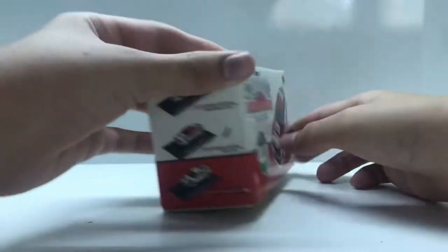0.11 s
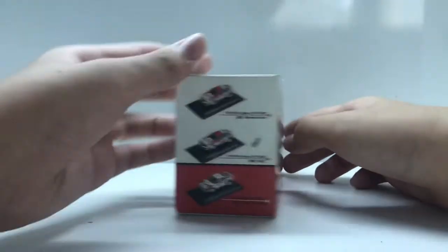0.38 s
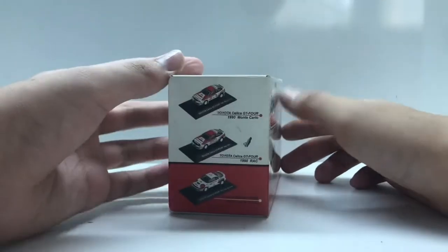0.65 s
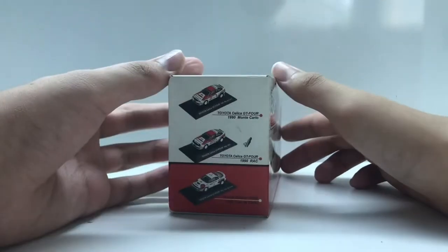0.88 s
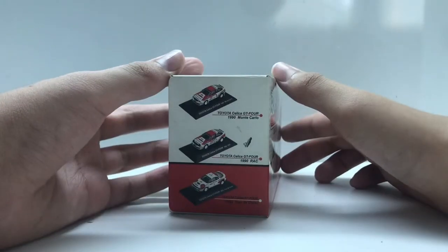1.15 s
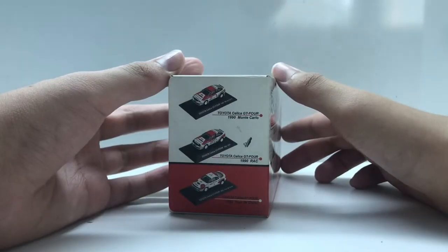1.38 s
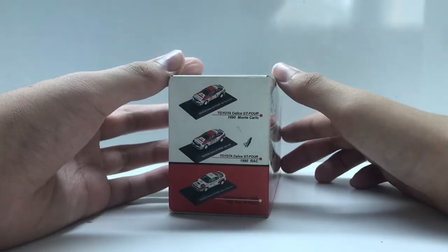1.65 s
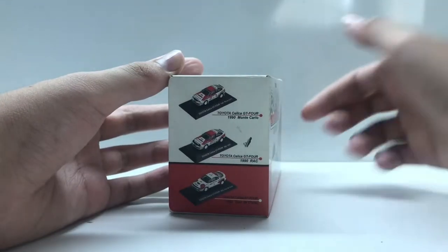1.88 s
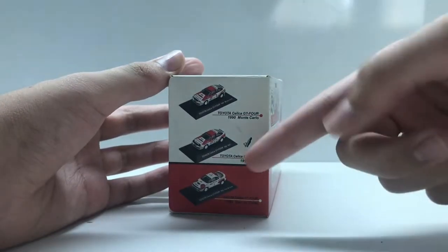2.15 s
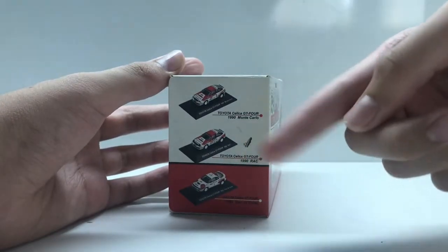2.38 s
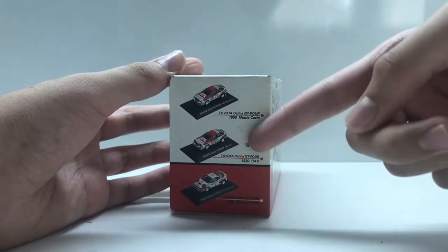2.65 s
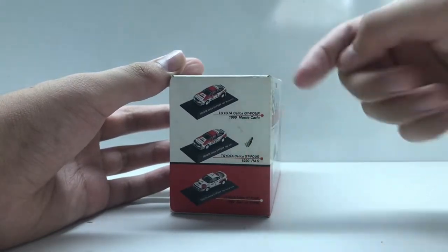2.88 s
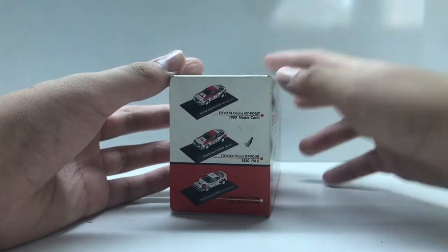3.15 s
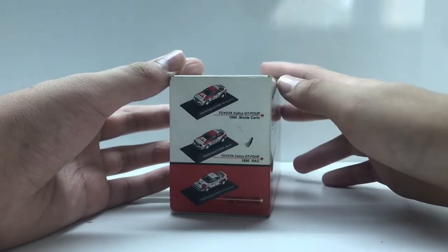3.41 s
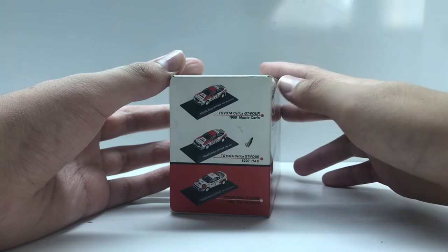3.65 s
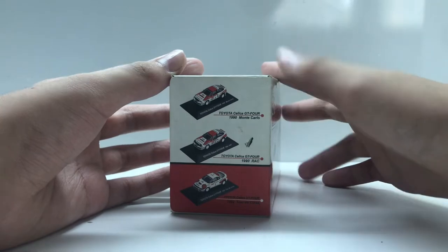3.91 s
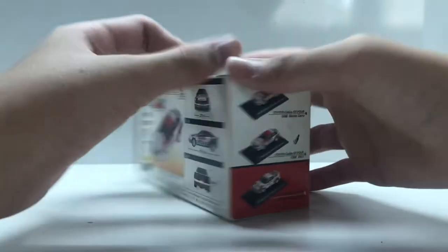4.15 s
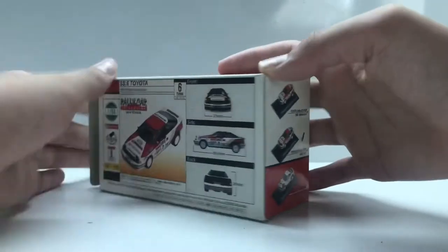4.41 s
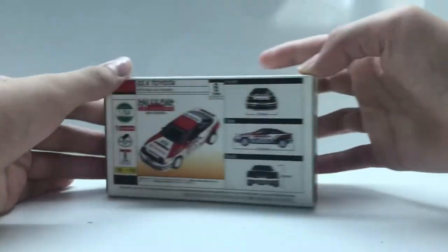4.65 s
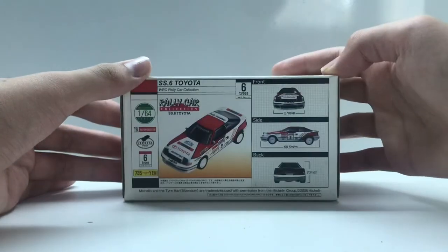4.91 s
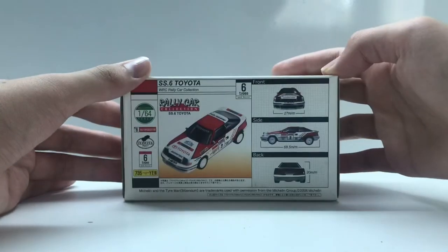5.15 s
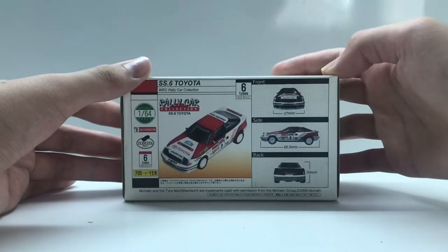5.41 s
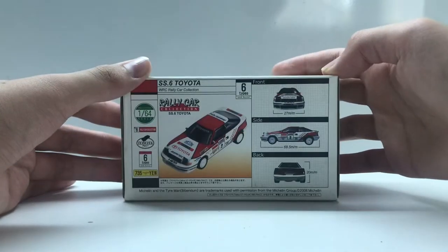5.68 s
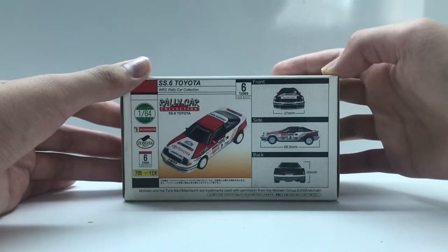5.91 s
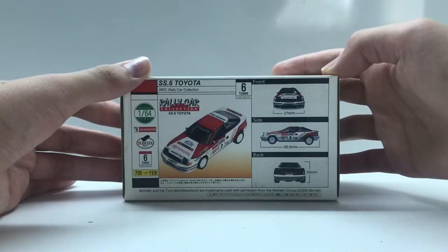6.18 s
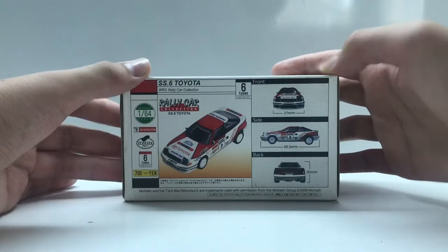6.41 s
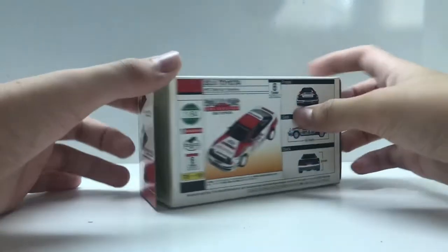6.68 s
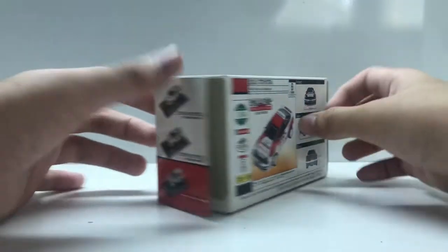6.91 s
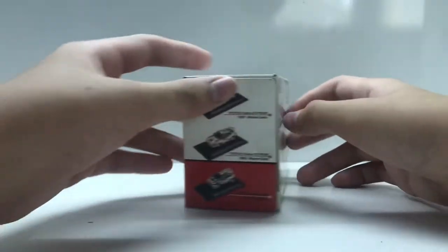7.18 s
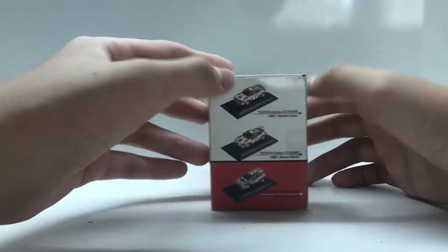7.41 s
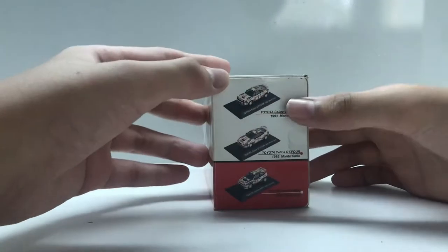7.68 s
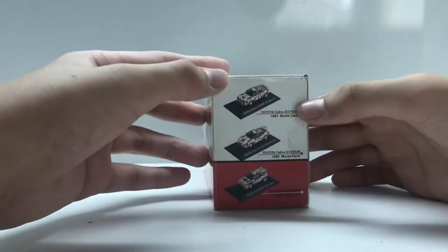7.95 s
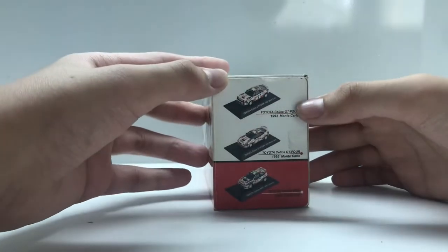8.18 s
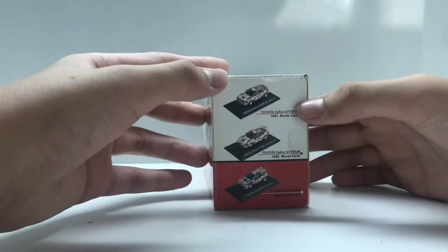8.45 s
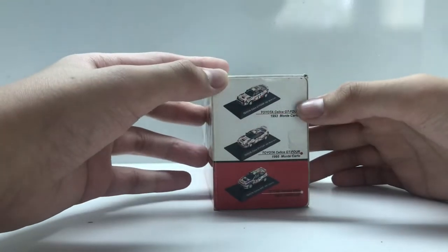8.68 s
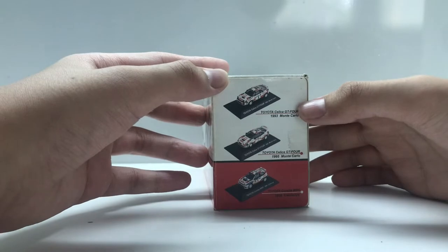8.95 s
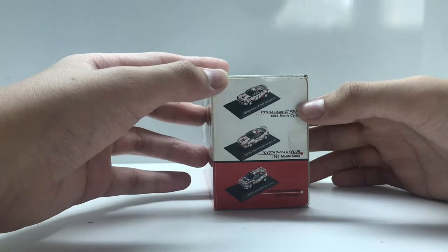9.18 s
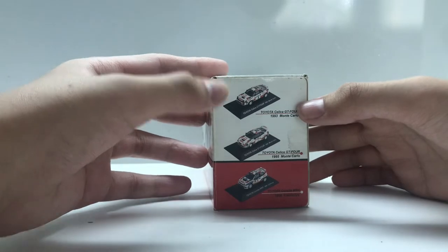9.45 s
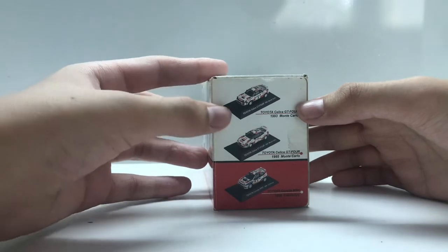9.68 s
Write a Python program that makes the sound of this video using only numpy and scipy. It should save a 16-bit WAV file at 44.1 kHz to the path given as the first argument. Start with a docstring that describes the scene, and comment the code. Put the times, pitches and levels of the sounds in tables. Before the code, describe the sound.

Hands shift a light, hollow card box on a table: quick knocks and rubs first, then near silence, a soft low hand thump and two loud, crisp nail taps. Later come dry, slightly squeaky slides as it turns, a pause, more slides ending in hard clacks, then quiet and a few tiny touches. Close microphone, small room, low background hum and hiss.

```python
"""A small cardboard box is turned by hand on a hard table, close to the microphone in a quiet room.
Friction and singing edges make its slides; touches, knocks and two fingernail taps ring its modes.
Soft hand landings ring the table top as low decaying tones; desk and walls answer the box as filtered noise.
Behind it are wavering sines and narrow drones of a far engine, and shaped noise for room and microphone hiss."""
import sys
import numpy as np
from scipy import signal
from scipy.fft import rfft, irfft, next_fast_len
from scipy.io import wavfile
from scipy.ndimage import uniform_filter1d

SR = 44100
rng = np.random.default_rng(int(sys.argv[2]) if len(sys.argv) > 2 else 0)


def linear_from_db(decibels):
    """Turn decibels (scalar or array-like) into linear amplitude factors; 0 gives 1."""
    return 10 ** (np.asarray(decibels, float) / 20)


def master_out(mix):
    """Clip the mix to full scale and print it as 16-bit PCM to the path in sys.argv[1]."""
    frames = np.transpose(np.atleast_2d(mix))
    ceiling = np.clip(frames, -1, 1)
    pcm = np.round(ceiling * 32767).astype(np.int16)
    wavfile.write(sys.argv[1], SR, pcm)


N = 433062   # length of the scene in samples

# pitches of the box modes: f/Hz
MODE_HZ = [170, 255, 350, 445, 535, 613, 692, 785, 943, 1090, 1120, 1235, 1350, 1650, 2150, 2600, 3030,
           3500, 3910, 4240, 4480, 5250, 5900, 6600, 8400, 10900, 14300]
# box modes, one row for each pitch:
# t60 when struck/s, level struck on the end/dB, level struck on the long side/dB, level dragged/dB
BOX_MODES = [(0.022, -13, -13.5, -22), (0.043, -10.5, -8, -11), (0.014, -7, -6, -6),
             (0.067, -7, -17.5, -15.5), (.03, -16, -12, -15), (0.051, -15.5, -2.5, -17.5),
             (.04, -16.5, -9, -16), (0.035, -17, -7.5, -5.5), (0.031, -15, -4.5, -5.5),
             (0.029, 1.5, -10, -5.5), (0.19, -30.5, -30, -25), (0.023, -13.5, -12.5, -17),
             (0.029, -7.5, -7, -6.5), (0.005, 2.5, -4, -2.5), (0.0078, -10.5, -5, -4),
             (0.011, -12.5, -8.5, -7.5), (0.014, -24.5, -20.5, -6), (0.0078, -29.5, -5, -10.5),
             (.016, -17, -16.5, -15.5), (0.027, -23.5, -21, -14.5), (0.015, -12, -19, -17),
             (0.0016, 9.5, -12, 1.5), (0.005, -8.5, -10.5, -16), (0.0044, -23, -9, -16),
             (0.0048, -11, -15, -16), (0.002, -5, -9, -16), (.002, -8, -9.5, -16)]


def rms_one(x):
    """Scale to unit power."""
    return x / np.sqrt(np.mean(x ** 2) + 1e-20)


def evened(x):
    """Hold the power of a signal steady over about 60 ms."""
    return x / np.sqrt(uniform_filter1d(x ** 2, size=2600) + 1e-20)


def in_time(rows):
    """Columns of a curve at every sample."""
    s, *columns = np.transpose(rows)
    return np.array([np.interp(np.arange(N) / SR, s, c) for c in columns])


def drift(rate_hz):
    """Slow random wander of spread 1: noise through two equal poles, drawn at every 40th sample."""
    hop, settle = 40, 2000
    r = np.exp(-2 * np.pi * rate_hz * hop / SR)
    noise = rng.standard_normal(N // hop + 2 + settle)
    slow = signal.lfilter([1], [1, -2 * r, r * r], noise)[settle:]
    return np.interp(np.arange(N) / hop, np.arange(len(slow)), rms_one(slow))


def ring(force, hz, t60):
    """A mode as a two-pole resonator: a unit click sets a decaying sine of starting height 1 ringing."""
    r = linear_from_db(-60 / (t60 * SR))
    w = 2 * np.pi * hz / SR
    return signal.lfilter([0, np.sin(w)], [1, -2 * r * np.cos(w), r * r], force + 1e-18)


def coloured(x, spectrum):
    """Filter a signal by a curve of (Hz, dB), straight over log frequency; rms 1."""
    size = next_fast_len(N)
    hz, db = np.transpose(spectrum)
    grid = np.maximum(np.fft.rfftfreq(size, 1 / SR), 1)
    gain = linear_from_db(np.interp(np.log(grid), np.log(hz), db))
    return rms_one(irfft(rfft(x, size) * gain, size)[:N])


def air():
    """Room noise and microphone hiss: random noise with a fixed colour and a slowly wavering level."""
    # colour of the noise: f/Hz, relative level per Hz/dB
    air_colour = [(15, -61), (30, -19), (64, -5), (145, -2.5), (317, -14), (405, -14), (463, -18),
                  (775, -25), (936, -22.5), (1330, -24), (2110, -33.5), (2610, -34), (5000, -41.5),
                  (10400, -46.5), (14800, -45), (16000, -71.5)]
    # the room noise sinks late: t/s, level over the base/dB
    air_swell = [(0, 4.5), (6.2, 4), (7, 4.5), (9.82, 1)]
    base_db, waver_db = -58.5, drift(3.)
    level = linear_from_db(base_db + in_time(air_swell)[0] + waver_db)
    return level * coloured(rng.standard_normal(N), air_colour)


def rumble():
    """A far engine: sines wavering in pitch and level, and narrow bands of noise that come and go."""
    # two engine tones, each with rows of: t/s, f/Hz, level/dB
    engine_tones = [
        [(0, 90.1, -60.5), (2.1, 85.5, -58), (2.55, 85.8, -47), (3.3, 85.3, -56), (3.7, 86, -60.5),
         (4.4, 91.6, -60), (6.5, 83.8, -55.5), (7.9, 83.1, -64), (8.3, 82.3, -67), (9.82, 81.8, -61.5)],
        [(0, 129.5, -50), (.5, 125.9, -67), (1.3, 130.3, -52.5), (1.7, 131.2, -60), (2.8, 128.6, -62),
         (3.5, 132.4, -51), (4.2, 134.4, -56.5), (4.9, 135, -53), (5.02, 134.9, -64), (5.15, 136.1, -46),
         (5.4, 134.5, -57.5), (6.3, 125.7, -57.5), (6.8, 128.8, -67), (8.5, 151.1, -62.5), (9.0, 144, -55.5),
         (9.4, 140.4, -67), (9.82, 137, -60.5)],
    ]
    # fainter tones and a low drone: start/s, end/s, f/Hz, level/dB, width/Hz
    drones = [(1.35, 3.9, 214, -62, 0.5), (3.46, 5.1, 180, -62, 2.3), (0.13, 11, 62, -58.5, 6.8)]
    fade_s = 0.16   # centred on each start and end
    out, t = 0, np.arange(N) / SR
    for tone in engine_tones:
        hz, level_db = in_time(tone)
        level = np.sqrt(2) * linear_from_db(level_db + 3.0 * drift(8.3))
        wavering_hz = hz + 1.5 * drift(3.)
        out = out + level * np.sin(2 * np.pi * np.cumsum(wavering_hz) / SR)
    for start, end, hz, db, width in drones:
        band = signal.butter(1, [hz - width / 2, hz + width / 2], "band", fs=SR, output="sos")
        on = np.clip(np.minimum(t - start, end - t) / fade_s + .5, 0, 1)
        noise = signal.sosfilt(band, rng.standard_normal(N + SR))[SR:]   # the filter settles for 1 s
        out = out + linear_from_db(db) * on * rms_one(noise)
    return out


def room(x):
    """Dense echoes off the desk die at once; the walls answer later, diffuse and longer."""
    desk_t60_s, desk_db = 0.03, -10.5
    wall_t60_s, wall_db, wall_lag_s, wall_cut_hz = 0.37, -21.5, 0.014, 13000
    bass_cut_hz = 706   # thins both echoes after their levels are set
    t = np.arange(SR // 2) / SR
    scatter = rng.standard_normal((2, len(t)))
    desk = scatter[0] * linear_from_db(-60 * t / desk_t60_s) * (t > .001)
    walls = scatter[1] * linear_from_db(-60 * t / wall_t60_s) * np.clip(t / wall_lag_s, 0, 1) ** 3
    walls = signal.sosfilt(signal.butter(1, wall_cut_hz, fs=SR, output="sos"), walls)
    echo = linear_from_db(desk_db) * desk / np.linalg.norm(desk) + linear_from_db(wall_db) * walls / np.linalg.norm(walls)
    echo = signal.sosfilt(signal.butter(1, bass_cut_hz, "high", fs=SR, output="sos"), echo)
    return signal.fftconvolve(x, echo)[:N]


def thud():
    """A hand lands softly: a smooth push of three quarters of a cycle rings the table top."""
    # soft landings: t/s, f/Hz, strength/dB, t60/s
    landings = [(1.946, 78, -36, 0.24), (9.418, 230, -41.5, 0.023), (9.426, 258, -40.5, 0.028),
                (9.442, 203, -45, 0.063)]
    out = 0
    for s, hz, db, t60 in landings:
        phase = (np.arange(N) / SR - s) * hz / .75
        push = np.sin(np.pi * np.clip(phase, 0, 1)) ** 2
        out = out + linear_from_db(db) * ring(2 * push / push.sum(), hz, t60)
    return out


def pushes(count, contact_ms):
    """A short contact is a click, a long one a crumbling puff: 40 ms of force in each row, unit energy."""
    after = np.arange(int(.04 * SR))
    phase = after / (contact_ms * SR / 1000)
    puff = rng.standard_normal((count, len(after))) * np.sqrt(phase) * np.exp(-phase)
    click = (after == 0) * 0.71 / contact_ms
    push = click + puff / np.linalg.norm(puff, axis=1, keepdims=True)
    return push / np.linalg.norm(push, axis=1, keepdims=True)


def blows(count, contact_ms, crumble):
    """A hard contact is one smooth push plus a little crumbling that outlasts it."""
    phase = (np.arange(int(.04 * SR)) + 1) / (contact_ms * SR / 1000)
    push = np.sin(np.pi * np.minimum(phase, 1)) ** 2
    return push / push.sum() + crumble * pushes(count, 2 * contact_ms)


def contacts():
    """Every push rings the box; weight drives the low modes, hardness the high ones and the crack."""
    # touches of fingers and card: t/s, strength/dB, weight/dB, hardness/dB, long side share/0-1
    touch_rows = [(0.3846, -35, -16, -9, 0.5), (0.432, -30.5, 0, -1.5, 0.43), (0.459, -33.5, 7.5, -13, 0.9),
                  (0.504, -51, -9, -3, .5), (0.647, -32, -20, -8, 0.24), (0.68, -40.5, -10, -4, 0.6),
                  (0.854, -46.5, -10, -3, 0.45), (1.755, -36, -14, -18, 0.6), (1.801, -38.5, -21, 3, 0.93),
                  (1.926, -38.5, -9, -15, 0.8), (2.02, -53, -15, -3, 0.39), (3.16, -33.5, 5, -5, 0.8),
                  (3.176, -32, -8, -19, .3), (3.181, -32.5, -13, -3, 0.74), (3.186, -29, -12, -15, 0.4),
                  (3.213, -33.5, -25, -6, 0.65), (3.263, -37, -13, -11.5, 0.4), (3.272, -41, -11, -5, 0.6),
                  (3.278, -51, -8, -9, 0.1), (3.303, -41.5, -17, -20, 0.51), (3.581, -49, 3.5, -19, 0.94),
                  (3.923, -38.5, 1, -11, 0.87), (3.947, -38, 2, -17, 1), (4.38, -37, 12, -22, 0.94),
                  (4.448, -47, -17, -2, 0.3), (4.828, -39.5, -7, 3, 0.5), (4.9473, -28, -6.5, -6.5, 0.5),
                  (5.46, -45.5, -6, -14.5, 0.9), (6.38, -45, -1, -8, 0.94), (6.393, -41.5, -10, 1, 0.6),
                  (6.409, -30, -3, -2.5, 0.5), (6.526, -29.5, 7, -24, 0), (6.578, -43, -12, -2, .4),
                  (6.611, -37, 13.5, -7, 1), (6.852, -33, -10, -8, 0.2), (7.218, -41, 1, -18, 0.5),
                  (7.542, -40, -11, -9, 0.6), (7.612, -38.5, -6, -5, 0.4), (7.653, -37.5, -12, -0.5, 0.72),
                  (9.521, -36.5, -4, -2, 0.7), (9.543, -42, -9, -11, 0.8)]
    # the box knocks on the table: t/s, strength/dB, weight/dB, hardness/dB, long side share/0-1
    knock_rows = [(0.076, -23.5, -10, -19, 0.1), (0.094, -25.5, 10.5, -9, 0.97),
                  (0.242, -22.5, -4.5, -6.5, 0.38), (0.2441, -40, 5, -26, 0.2), (6.966, -21.5, -3, 2, 0.5),
                  (6.967, -24, -6, -9.5, 0.4), (6.9728, -29, -11, -35, 0.76), (7.121, -31, 3.5, -20, 0.7)]
    # two fingernail taps, two pushes each: t/s, strength/dB, weight/dB, hardness/dB, long side share/0-1
    nail_rows = [(2.4278, -36, -5, 20, .1), (2.4281, -13.5, -1, 6, .1), (2.5966, -34, -5, 20, .02),
                 (2.5969, -11.5, 0, 6, 0.02)]
    # where a blow lands it favours the modes near one pitch: t of the nearest blow/s, f/Hz, boost/dB
    favoured = [(.242, 730, 10.5), (2.2, 1090, 3), (2.5969, 1090, 1), (1.9, 610, 4.5), (2.5969, 540, 0),
                (2.4281, 4800, -8), (1.7, 3100, -7), (1.801, 1300, 7.5), (4.828, 1200, 10),
                (5.461, 1150, 9), (6.965, 1005, 2.5), (6.965, 2500, 5.5), (6.973, 613, 15),
                (9.521, 1150, 9), (9.543, 1100, 11)]
    favour_octaves = .2
    low_hz, mid_hz, high_hz = 450, (600, 1700), 3500   # corners of the low, middle and high modes
    mid_modes_db, crack_db, crack_band_hz = -4.5, -10.5, [3000, 8000]

    s, strength_db, weight_db, hard_db, side_share = np.transpose(touch_rows + knock_rows + nail_rows)
    push = np.vstack([pushes(len(touch_rows), 1.61),   # skin or card
                      blows(len(knock_rows), 0.2, 0.36),   # a corner of the box
                      blows(len(nail_rows), .07, 0.036)])   # a nail
    at = np.round(s * SR).astype(int)[:, None] + np.arange(push.shape[1])

    def force(db):
        """All pushes on one time line, each with its own gain."""
        return np.bincount(at.ravel(), (push * linear_from_db(strength_db + db)[:, None]).ravel(), N)

    share = np.clip(side_share, 0, 1)
    mode_db = rng.normal(0, 1.5, (len(s), len(BOX_MODES)))   # no two blows ring the modes alike
    for when, hz, db in favoured:
        octaves = np.log2(np.array(MODE_HZ) / hz)
        mode_db[np.argmin(abs(s - when))] += db * np.exp(-(octaves / favour_octaves) ** 2)

    # the bare crack of the contact
    crack_band = signal.butter(1, crack_band_hz, "band", fs=SR, output="sos")
    out = signal.sosfilt(crack_band, force(hard_db + crack_db))
    corners = np.log([low_hz, *mid_hz, high_hz])
    for k, (hz, (t60, end_db, side_db, _)) in enumerate(zip(MODE_HZ, BOX_MODES)):
        heavy = np.interp(np.log(hz), corners, [1, 0, 0, 0])
        hard = np.interp(np.log(hz), corners, [0, 0, 0, 1])
        reach_db = heavy * weight_db + hard * hard_db + (1 - heavy - hard) * mid_modes_db
        face_db = end_db + share * (side_db - end_db)
        out = out + (-1) ** k * ring(force(reach_db + face_db + mode_db[:, k]), hz, t60)
    return out


def fibres(per_s, spread_db):
    """Tiny slips of card fibres: random clicks of uneven size and either sign."""
    sizes = linear_from_db(spread_db * np.minimum(rng.exponential(1, N), 5)) * rng.choice([-1, 1], N)
    return sizes * (rng.random(N) < per_s / SR)


def strokes():
    """Each stroke takes hold, swells or sags, and lets go; gains of body, scratch and hiss."""
    # card or skin rubs along table and box:
    # start/s, length/s, scratch level/dB, swell over the stroke/dB, box body over scratch/dB
    stroke_rows = [(0.0, 0.028, -51, -5, 7.5), (0.098, 0.085, -48, -3.5, 5.5), (0.206, 0.12, -64, 6, 7.5),
                   (0.385, 0.023, -53, 5, 6.5), (0.454, 0.055, -60.5, -9, 11), (0.564, 0.099, -61, 0, 8.5),
                   (1.763, 0.14, -57, -3, -3), (1.927, 0.054, -58.5, 9, -18), (2.021, 0.11, -64, -4.5, 0.5),
                   (3.058, 0.21, -71, 0, 3.5), (3.96, 0.11, -49, 3.5, 4), (4.122, 0.065, -44, -3.5, 1.5),
                   (4.234, 0.084, -58.5, 2, 8), (4.377, 0.079, -57.5, 5, 8), (4.492, 0.14, -49, -3, 5.5),
                   (4.661, 0.093, -51, 0.5, 6.5), (4.787, 0.18, -60.5, -18, 7),
                   (6.439, 0.117, -56.5, 5.5, 7.5), (6.603, 0.085, -44, -6, 4), (6.696, 0.064, -60.5, 0, 8),
                   (6.805, 0.034, -47, -8, 4), (6.873, 0.073, -50, -4.5, 6.5), (6.983, 0.08, -56.5, 7, 8),
                   (7.104, 0.175, -52.5, -8, 8), (7.316, 0.011, -51, -5, 5), (7.378, 0.068, -58.5, 1, 8),
                   (7.513, 0.052, -61, -10, 3.5), (9.04, 0.071, -71, -4, 6)]
    take_hold_s, let_go_s = 0.037, 0.041   # fade ahead of the start, fade after the length
    hiss_db, reference_scratch_db = -55.5, -50.5   # hiss level at this scratch level
    hiss_growth = 1.2   # dB of hiss per dB of scratch
    t, power = np.arange(0, N + 64, 64) / SR, 0
    for start, length, db, swell_db, body_db in stroke_rows:
        rise = 1 + (t - start) / take_hold_s
        fall = 1 - (t - start - length) / let_go_s
        held = np.clip(np.minimum(rise, fall), 1e-4, 1)
        scratch_db = db + swell_db * np.clip((t - start) / length, 0, 1) + 20 * np.log10(held)
        edge_db = hiss_db + hiss_growth * (scratch_db - reference_scratch_db)
        power = power + linear_from_db(np.array([scratch_db + body_db, scratch_db, edge_db])) ** 2
    return in_time(np.vstack([t, np.sqrt(power)]).T)


def singing(slips):
    """The sliding edge sings: slips pass through a narrow resonance gliding between two pitches."""
    # start/s, end/s, first f/Hz, last f/Hz, level over scratch/dB
    sung = [(0.107, 0.166, 3020, 3430, 1.5), (0.377, 0.424, 1330, 1290, 10),
            (0.544, 0.677, 4250, 4100, -1.5), (0.557, 0.685, 1100, 1150, 11), (1.795, 1.89, 4500, 4500, -5),
            (1.834, 1.912, 6100, 6100, -7), (1.935, 2.0, 2450, 2730, -13), (1.966, 2.0, 3145, 3450, -13),
            (3.951, 4.078, 740, 806, 2.5), (4.113, 4.2, 4400, 4250, -16), (4.112, 4.21, 2650, 2720, -13),
            (4.243, 4.268, 4540, 4500, -2), (4.398, 4.465, 2700, 2600, -2.5),
            (4.487, 4.616, 3140, 2950, -3.5), (4.53, 4.78, 1110, 1080, 4), (4.63, 4.815, 2520, 2550, -5.5),
            (6.564, 6.676, 3200, 3100, -7), (6.57, 6.673, 2600, 2700, -4), (6.777, 6.945, 3350, 3330, -1.5),
            (6.842, 6.937, 1090, 1110, -11), (7.032, 7.26, 2600, 2610, 0), (6.992, 7.145, 605, 785, 2.5),
            (7.277, 7.326, 3620, 3520, -4), (7.37, 7.435, 3080, 2700, -4)]
    width_hz = 190
    out, r = np.zeros(N), np.exp(-np.pi * width_hz / SR)
    for start, end, first_hz, last_hz, db in sung:
        a, b = round(start * SR), round(end * SR)
        turn = np.exp(2j * np.pi * np.cumsum(np.linspace(first_hz, last_hz, b - a)) / SR)
        # shift the gliding pitch down to zero, smooth, and shift it back
        tone = (signal.lfilter([1], [1, -r], slips[a:b] / turn) * turn).real
        out[a:b] += linear_from_db(db) * rms_one(tone) * signal.windows.tukey(b - a, .5)
    return out


def slides():
    """Friction shakes the box modes and hisses at the sliding edge."""
    # colour of the edge hiss ahead of its high-pass: f/Hz, relative level per Hz/dB
    hiss_colour = [(880, -30), (1500, -9.5), (1940, -15), (2640, -5), (4290, -26), (4870, -4), (9190, -9),
                   (10100, -13), (13100, -8), (15800, -13), (16200, -48)]
    # how much the long side of the box drags as it turns: t/s, share/0-1
    face = [(0, 0.48), (4, 0.54), (4.8, 0.84), (6.4, 0.56), (7.1, 0.54), (9.82, 0.7)]
    body, scratch, hiss = strokes()
    slips = fibres(per_s=10000., spread_db=2.5)
    chatter = linear_from_db(2.1 * drift(90.))   # the edge catches and lets go
    share, low, mid = np.clip(in_time(face)[0], 0, 1), 0, 0
    for hz, (t60, end_db, side_db, drag_db) in zip(MODE_HZ, BOX_MODES):
        grip_db = 3.5 * drift(5.)   # fingers damp now one mode, now another
        face_db = (share - .5) * (side_db - end_db)
        shake = np.roll(slips, rng.integers(N)) * linear_from_db(drag_db + face_db + grip_db)
        # a dragged mode rings shorter than a struck one
        if 200 < hz < 1500:
            low = low + ring(shake, hz, 0.41 * t60)
        elif 1500 < hz < 5600:
            mid = mid + ring(shake, hz, 0.39 * t60)
    high_pass = signal.butter(2, 5500, "high", fs=SR, output="sos")
    high = signal.sosfilt(high_pass, coloured(slips, hiss_colour))
    scraping = evened(mid) + singing(slips[::-1])
    return chatter * (body * evened(low) + scratch * scraping + hiss * rms_one(high))


def scene():
    """Box near the microphone, in the room, over the noise."""
    box = slides() + contacts()
    # the box carries no bass below about 110 Hz
    box = signal.sosfilt(signal.butter(2, 110, "high", fs=SR, output="sos"), box)
    return (box + room(box) + thud() + rumble() + air())[None]


def roll_off(x):
    """The treble ends steeply here."""
    return signal.sosfilt(signal.butter(12, 16300, fs=SR, output="sos"), x)


def record(dry):
    """The microphone rounds off its loudest peaks."""
    overload = 1.3   # the highest level it can approach
    return roll_off(overload * np.tanh(dry / overload))


dry = scene()
out = record(dry)
master_out(out)
```